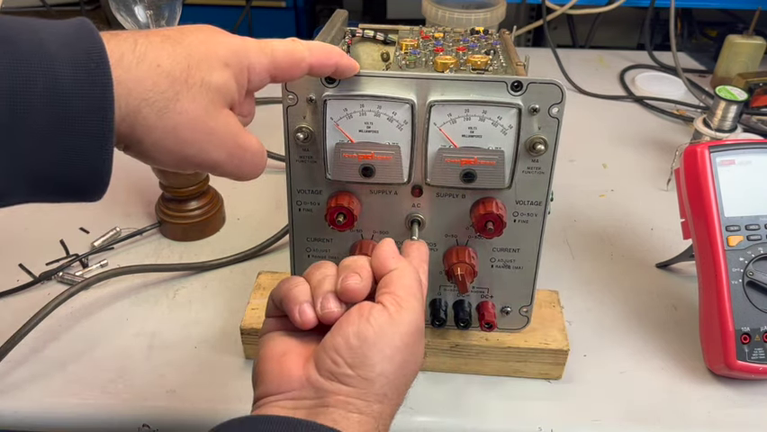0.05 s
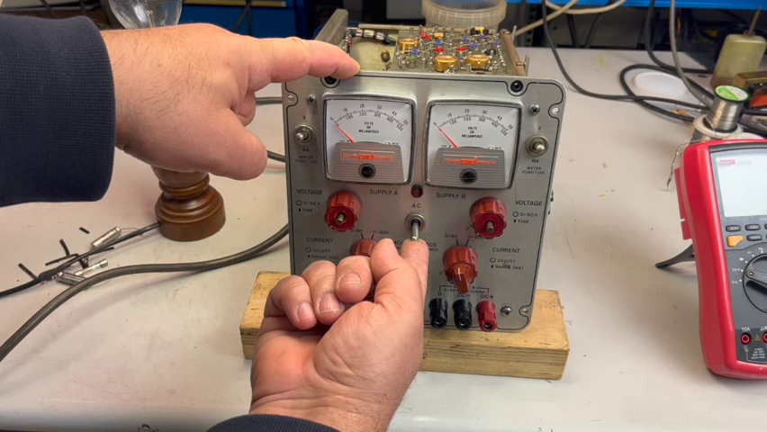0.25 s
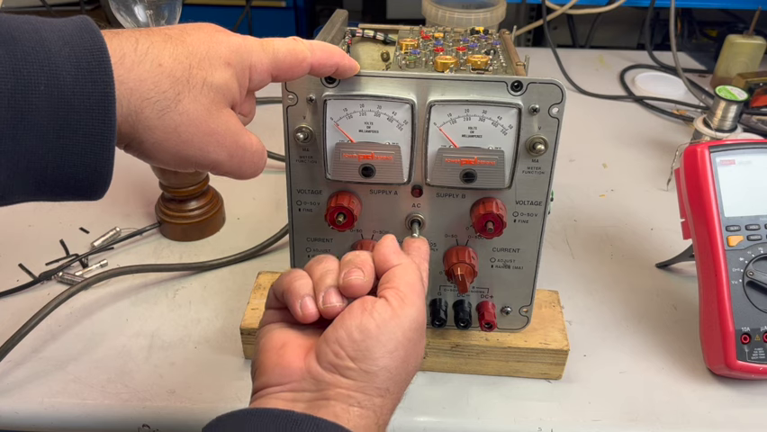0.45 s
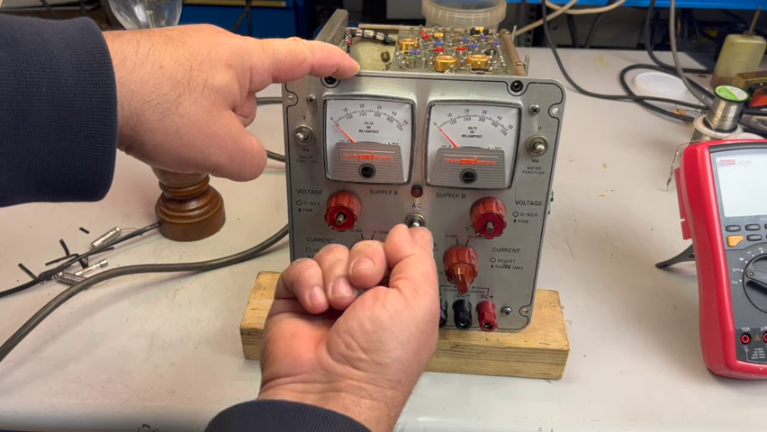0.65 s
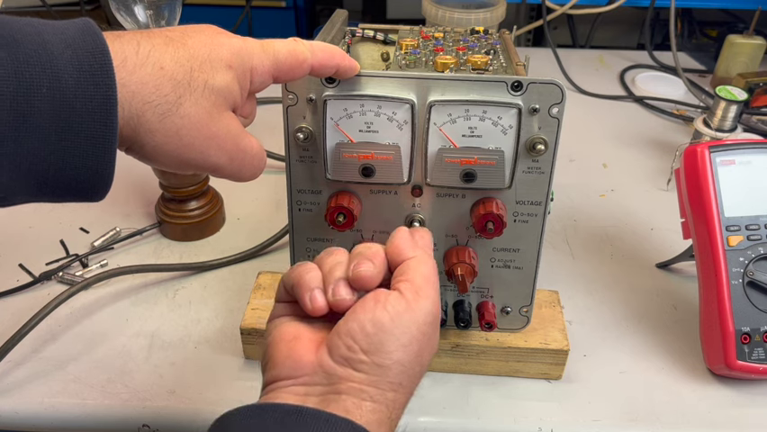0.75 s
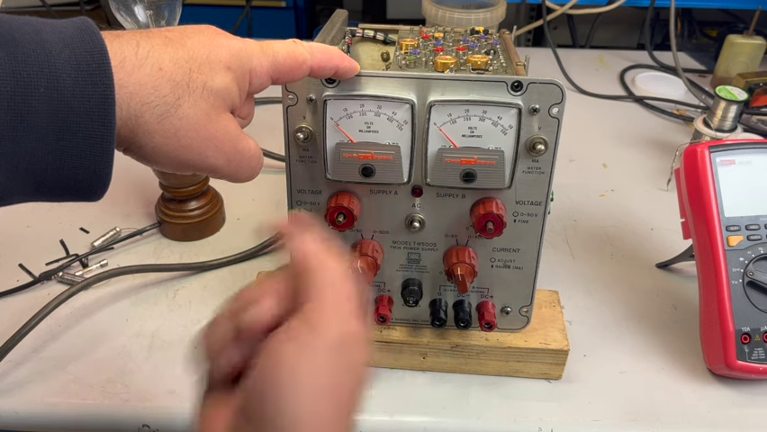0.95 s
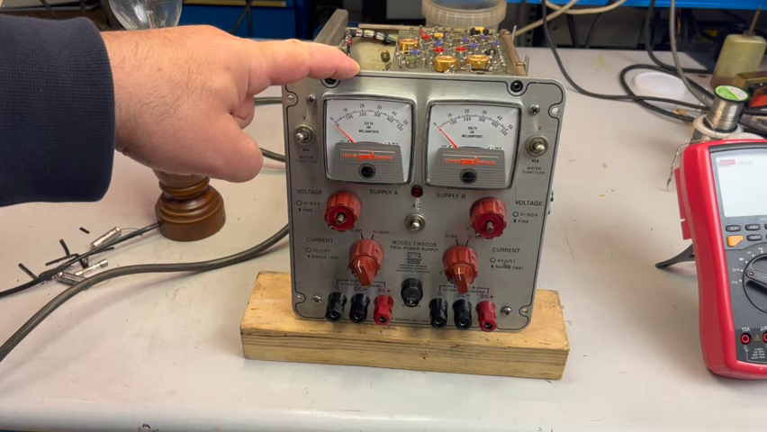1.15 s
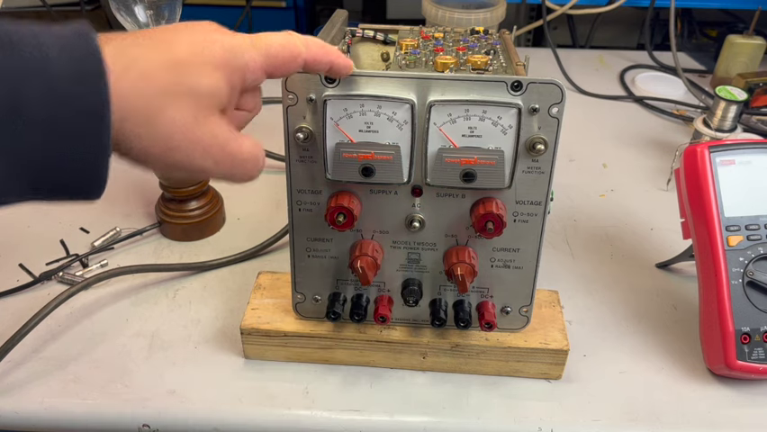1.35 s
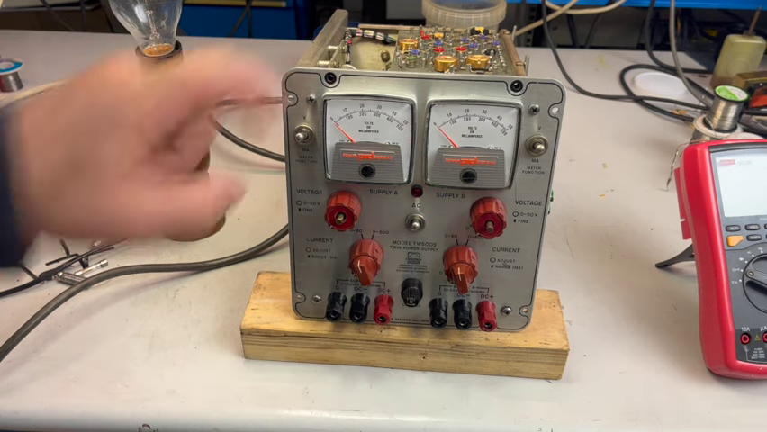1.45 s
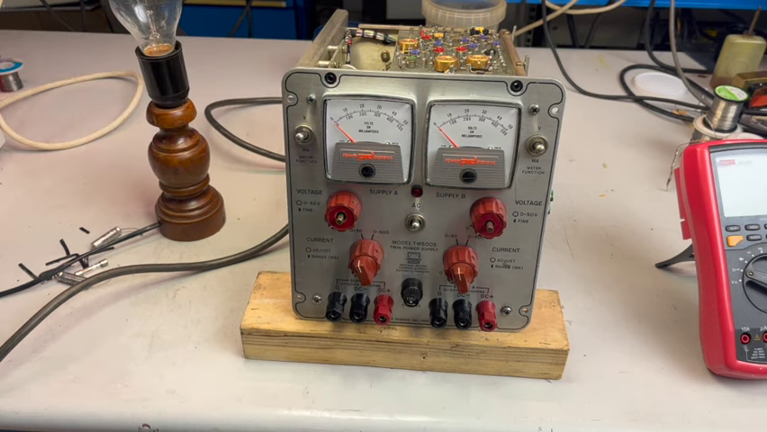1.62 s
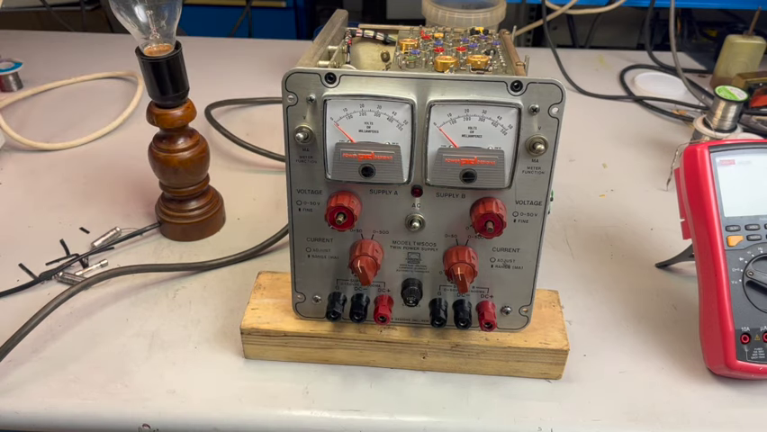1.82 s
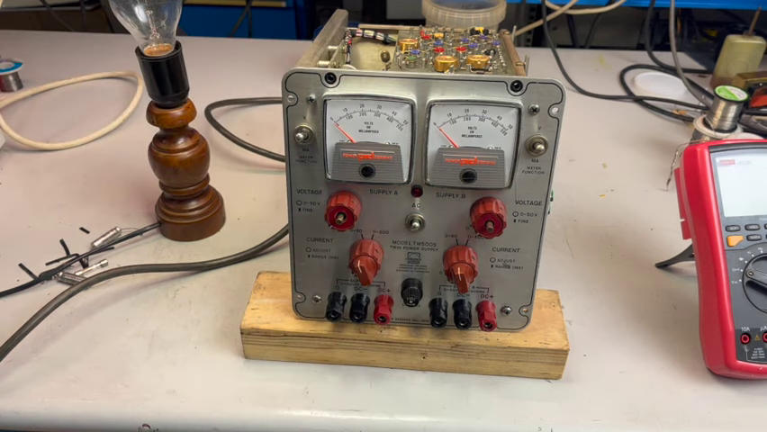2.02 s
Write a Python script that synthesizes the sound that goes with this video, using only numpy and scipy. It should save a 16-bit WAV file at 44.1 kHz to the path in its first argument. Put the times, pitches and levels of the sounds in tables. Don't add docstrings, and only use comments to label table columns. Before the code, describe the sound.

In a small quiet workshop, a switch lever ticks and slams over with a rapid bounce and brief room reflection, heard close in stereo; sleeves then brush softly as the hands leave, ventilation murmuring underneath.

```python
import sys
import numpy as np
from scipy import signal
from scipy.fft import rfft, irfft, next_fast_len
from scipy.io import wavfile
from scipy.ndimage import uniform_filter1d, map_coordinates

SR = 44100
rng = np.random.default_rng(int(sys.argv[2]) if len(sys.argv) > 2 else 0)


def volts_from_decibels(level):
    exponent = np.asarray(level, float) / 20
    return 10 ** exponent


def unload_wav(signal):
    wavfile.write(
        sys.argv[1],
        SR,
        np.round(np.clip(np.atleast_2d(signal).T, -1, 1) * 32767).astype(np.int16),
    )


N = 91595


def unit(x):
    return x / np.sqrt(np.mean(x ** 2) + 1e-20)


def along(points, hz):
    f, value = np.transpose(points)
    return np.interp(np.log(hz + 1), np.log(f + 1), value)


def wobble(rate, count=N):
    knots = rng.standard_normal(int(count * rate / SR) + 4)
    return map_coordinates(knots, [np.arange(count) * rate / SR])


def filtered(x, response):
    m = next_fast_len(x.shape[-1] + 8192)
    spectrum = rfft(x, m) * response(np.fft.rfftfreq(m, 1 / SR))
    return irfft(spectrum, m)[..., :x.shape[-1]]


# (frequency [Hz], correlation [-1 to 1])
LIKENESS = [(40, 1), (100, .94), (260, .83), (460, -0.0021), (1500, -0.29), (2000, .3), (6000, -0.04),
            (15000, -0.091)]
# (frequency [Hz], gain [dB])
SUM_GAIN = [(6800, 0), (7600, -5), (7850, -40), (8650, -40), (8900, -5), (10000, 0)]
# (frequency [Hz], gain [dB])
DIFFERENCE_GAIN = [(10300, 0), (10800, -36), (13400, -36), (13900, -12), (15500, -6), (16300, -40)]


def diffuse(pair, colour):
    def gains(hz):
        angle = np.arccos(np.clip(along(LIKENESS, hz), -1, 1)) / 2
        mid_gain = np.cos(angle) * volts_from_decibels(along(SUM_GAIN, hz))
        side_gain = np.sin(angle) * volts_from_decibels(along(DIFFERENCE_GAIN, hz))
        return volts_from_decibels(along(colour, hz)) * np.array([mid_gain, side_gain])

    mid, side = filtered(pair, gains)
    return unit(np.array([mid + side, mid - side]))


def rush(colour, patchy_db):
    z = signal.stft(rng.standard_normal((2, N + 512)), nperseg=512)[2]
    patches = uniform_filter1d(rng.standard_normal(z.shape[1:]), size=6, axis=0)
    patches = uniform_filter1d(patches, size=12, axis=1)
    noise = signal.istft(z * volts_from_decibels(patchy_db * unit(patches)), nperseg=512)[1][:, :N]
    return diffuse(noise, colour)


# (frequency [Hz], density [dB per Hz])
RUMBLE = [(25, -35), (42, 0.5), (85, -1.5), (260, -5), (400, -8.5), (480, -17), (1450, -19.5), (2600, -42),
          (4000, -71.5)]
# (frequency [Hz], density [dB per Hz])
VENT_HISS = [(1200, -21), (2500, -3), (5000, -12.5), (7500, -16), (9000, 1), (9700, -19), (13000, -19.5),
             (14000, -40.5)]
# (time [s], spread [s], swell [dB])
ARM_DRAUGHT = (0.94, 0.32, 2.8)


def ventilation():
    rumble_db, hiss_db = -56, -81
    middle_s, spread_s, swell_db = ARM_DRAUGHT
    t = np.arange(N) / SR
    swell = swell_db * np.exp(-((t - middle_s) / spread_s) ** 2)
    rumble = volts_from_decibels(rumble_db + swell + 1.2 * wobble(3)) * rush(RUMBLE, patchy_db=1.4)
    return rumble + volts_from_decibels(hiss_db) * rush(VENT_HISS, patchy_db=0.5)


# (time [s], level [dB], brightness [dB])
STROKES = [(.75, -100, 3.5), (.9, -83.5, -2), (0.971, -78.5, -5), (1.13, -75.5, -1.5), (1.27, -84, -1.5),
           (1.32, -70.5, -5), (1.37, -70.5, -4), (1.45, -83.5, 0), (1.62, -84.5, 4), (1.82, -89, 5),
           (1.92, -93, 3), (2.02, -87.5, 2), (2.08, -92.5, 1)]
# (frequency [Hz], level [dB])
CLOTH_COLOUR = [(300, -20), (700, -2.5), (1300, 2), (3000, -4.5), (7000, -15.5), (9000, -15.5),
                (10000, -35.5)]
# (frequency [Hz], level [dB])
FIBRE_COLOUR = [(6000, -28), (8500, -6.5), (11000, -1.5), (13000, 0), (14200, -9.5), (15000, -34)]


def sleeves():
    fibres_db = -5
    t = np.arange(N) / SR
    s, level, brightness = np.transpose(STROKES)
    level_db = np.interp(t, s, level)
    bright_db = np.interp(t, s, brightness)
    cloth = volts_from_decibels(-bright_db) * rush(CLOTH_COLOUR, patchy_db=2.5)
    fibres = volts_from_decibels(fibres_db + bright_db) * rush(FIBRE_COLOUR, patchy_db=1.2)
    return volts_from_decibels(level_db) * (cloth + fibres)


# (time [s], level [dB], pitch [Hz], t60 [s], rise [s], left over right [dB])
SOFT_THUDS = [
    (.505, -45, 85.5, 0.2587, 0.029, 2.5),
    (1.8, -45, 45, 0.77, 0.084, 2.5),
]


def thuds():
    t = np.arange(N) / SR
    out = np.zeros((2, N))
    for s, db, hz, t60, rise, left_db in SOFT_THUDS:
        since = np.clip(t - s, 0, None)
        envelope = volts_from_decibels(db - 60 * since / t60) * (1 - np.exp(-(since / rise) ** 2))
        thud = envelope * np.sin(2 * np.pi * hz * since + 0.8 * wobble(25))
        out += thud * volts_from_decibels(np.array([[left_db], [-left_db]]) / 2)
    return out


# (frequency [Hz], t60 [s])
ROOM_DECAY = [(300, .3), (1000, 0.38), (3000, 0.3), (6000, .33), (12000, 0.34)]
# (frequency [Hz], level [dB])
WALL_COLOUR = [(200, -7.5), (750, -10), (1000, 4), (1600, -2.5), (4500, 2.5), (7000, -7), (13600, -9),
               (14100, -45)]


def workshop(t):
    send_db, early_db, late_db = -5, -5, -17
    early_t60, first_wall_s = 0.045, 0.0023
    squeeze = 119.5
    hz, frame, z = signal.stft(rng.standard_normal((2, len(t))), SR, nperseg=256)
    late = volts_from_decibels(late_db - 60 * frame / along(ROOM_DECAY, hz)[:, None] - squeeze * frame ** 2)
    early = volts_from_decibels(early_db - 60 * frame / early_t60)
    tail = signal.istft(z * (late + early), SR, nperseg=256)[1][:, :len(t)]
    tail = tail * (1 - np.exp(-(t / first_wall_s) ** 2))
    return volts_from_decibels(send_db) * diffuse(tail, WALL_COLOUR) * np.sqrt(np.mean(tail ** 2))


def ring(modes, t, favour_hz, favour_db, buzz_rad):
    favour_oct = 0.35
    scatter_rad, turn_hz = 0.3, 12000
    hz, db, t60 = np.transpose(modes)[:, :, None]
    strength, scatter, start = rng.standard_normal((3, len(modes), 1))
    lift_db = favour_db * np.exp(-(np.log2(hz / favour_hz) / favour_oct) ** 2)
    size = volts_from_decibels(db + lift_db + 1.7 * strength - 60 * t / t60)
    wander = buzz_rad * np.array([wobble(110, count=len(t)) for _ in modes])
    phase = 2 * np.pi * hz * t + wander + 1.3 * start
    shift = scatter_rad * scatter - np.pi * (hz / turn_hz) ** 2
    return np.array([(size * np.sin(phase + side * shift)).sum(0) for side in (1, -1)])


# (frequency [Hz], level [dB])
CRACK_COLOUR = [(300, -22.5), (1200, -0.5), (7000, -1), (8300, -10.5), (12000, -1.5), (15000, -11.5),
                (16000, -33.5)]


def crack(t):
    level_db, t60 = -4, 0.007
    noise = unit(filtered(rng.standard_normal((2, len(t))), lambda hz: volts_from_decibels(along(CRACK_COLOUR, hz))))
    a, b = volts_from_decibels(level_db - 60 * t / t60) * noise
    return np.array([a + 0.46 * b, a - 0.36 * b])


# (time [s], peak level [dB], favoured pitch [Hz], favour [dB])
CONTACT_BLOWS = [
    (0.1174, -70, 3800, 26),
    (0.121, -71, 3500, 19),
    (.4480, -40.5, 8500, 8),
    (.4495, -53, 1400, 18.5),
    (0.453, -53, 5000, 3.5),
    (0.4926, -27, 2490, 2.5),
    (0.4928, -8, 5900, 4.5),
    (0.4953, -12, 1800, 12),
    (0.5006, -20, 4500, 8.5),
    (.5095, -30.5, 1086, 6),
]
# (frequency [Hz], level [dB], t60 [s])
BODY_MODES = [(1251, -7.5, 0.0118), (1850, -5.5, 0.0077), (2410, -11, 0.009), (2900, -3.5, .006),
              (3300, -8.5, .008), (3914, -10, 0.012), (4900, -11.5, 0.012), (5845, -0.5, 0.0081),
              (6250, -4, 0.006), (7060, -5, 0.008), (10300, -4, 0.0047), (12130, -2.5, 0.01),
              (13790, -8, .007)]
# (frequency [Hz], level [dB], t60 [s])
PANEL_MODES = [(500, -5.5, .05), (926, -7, .24), (1011, 2, 0.15), (1077, -3, 0.11), (1375, -6, 0.06),
               (1930, -10, .06), (2060, -13.5, .1), (2651, -16.5, .1), (3220, -15.5, .15),
               (4100, -15.5, .2), (4340, -10, 0.28), (4549, -9.5, .24), (5160, -10.5, .08),
               (5707, -13, .08)]


def switch():
    panel_db = -19
    body_rise_s, panel_rise_s = 0.0003, 0.003
    t = np.arange(SR // 3) / SR
    out = np.zeros((2, N))
    for s, db, hz, favour_db in CONTACT_BLOWS:
        panel = volts_from_decibels(panel_db) * ring(PANEL_MODES, t, hz, favour_db, buzz_rad=1.2)
        panel = panel * (1 - np.exp(-t / panel_rise_s))
        body = ring(BODY_MODES, t, hz, favour_db, buzz_rad=0) + crack(t)
        body = body * (1 - np.exp(-t / body_rise_s))
        out[:, round(s * SR):][:, :len(t)] += volts_from_decibels(db - 5.5) * (body + panel + workshop(t))
    return out * volts_from_decibels(np.array([[0.8], [-0.8]]))


def scene():
    background = (ventilation() + sleeves()) * volts_from_decibels(np.array([[0.4], [-0.4]]))
    return background + thuds() + switch()


# (frequency [Hz], gain [dB])
MIC_TREBLE = [(14800, 0), (15500, -13.5), (16300, -69)]


def roll_off(x):
    return signal.sosfilt(signal.butter(12, 15540, fs=SR, output="sos"), x)


def record(dry):
    mix = filtered(dry, lambda hz: volts_from_decibels(along(MIC_TREBLE, hz)))
    return roll_off(mix)


dry = scene()
out = record(dry)
unload_wav(out)
```